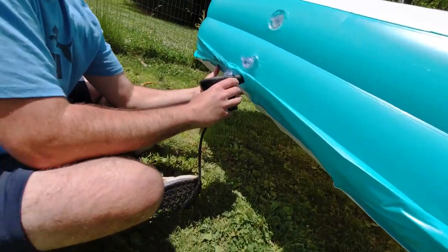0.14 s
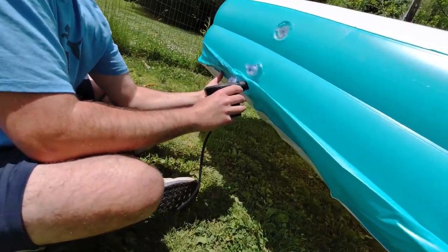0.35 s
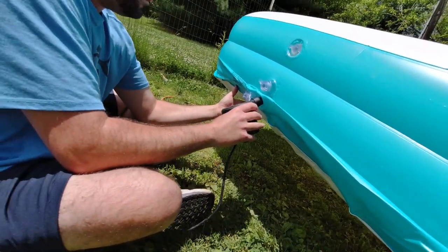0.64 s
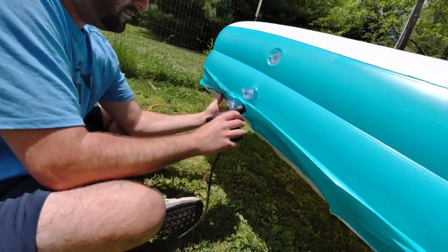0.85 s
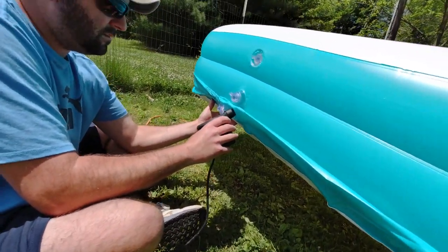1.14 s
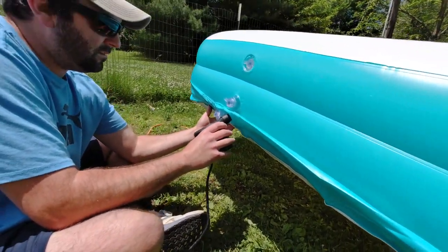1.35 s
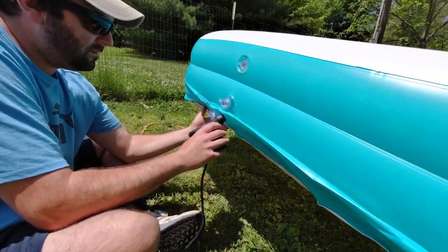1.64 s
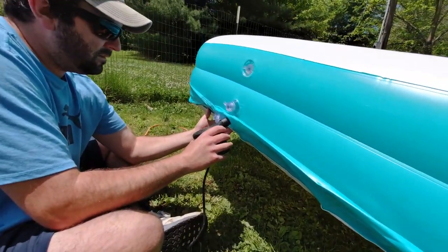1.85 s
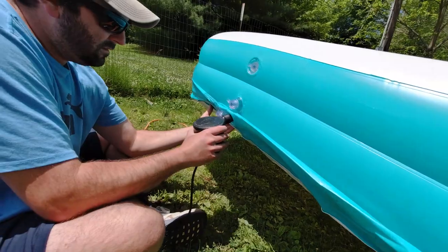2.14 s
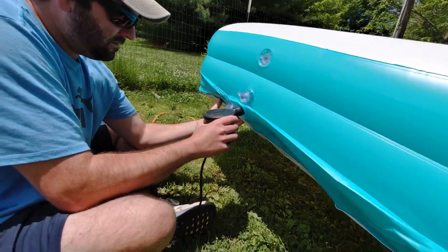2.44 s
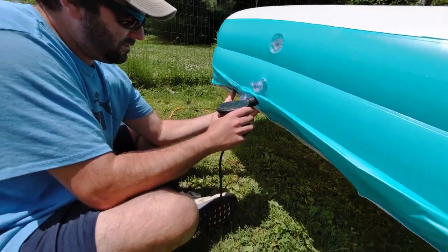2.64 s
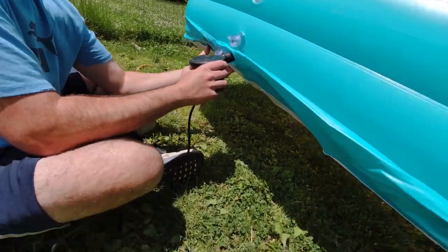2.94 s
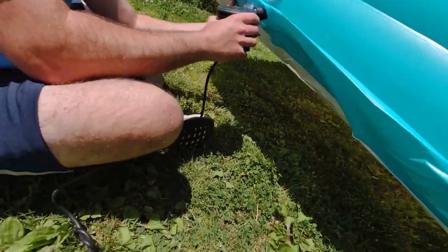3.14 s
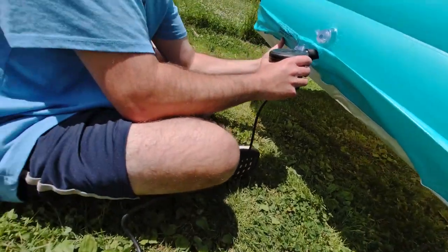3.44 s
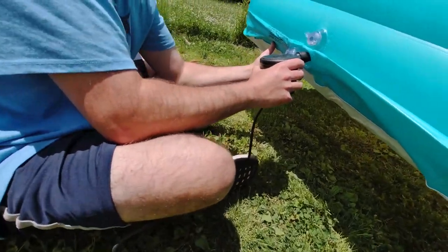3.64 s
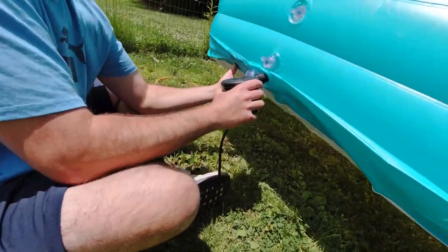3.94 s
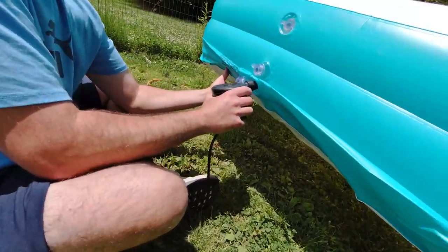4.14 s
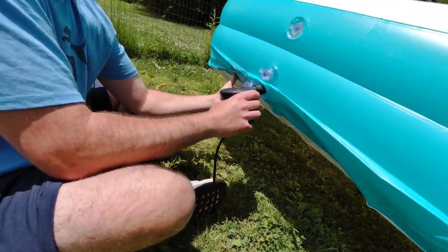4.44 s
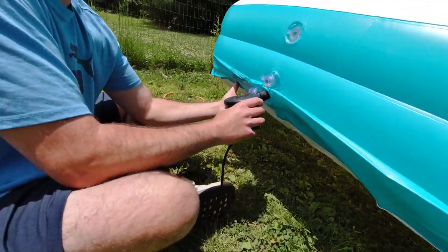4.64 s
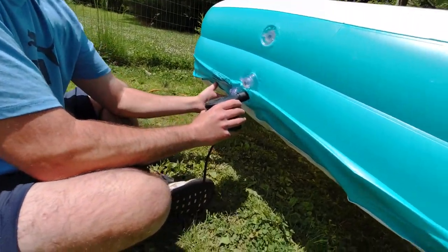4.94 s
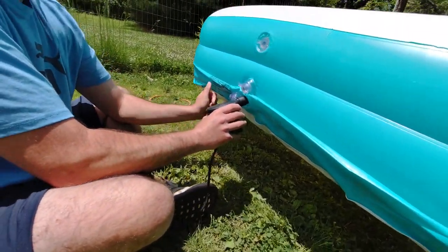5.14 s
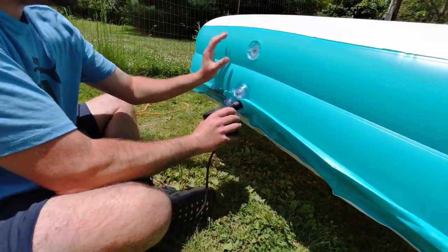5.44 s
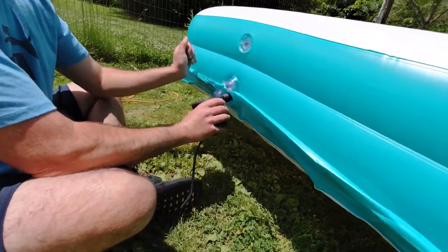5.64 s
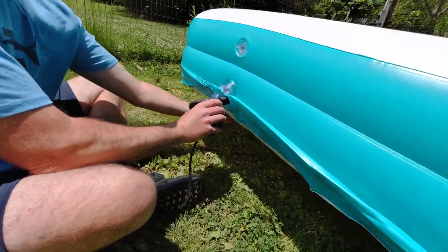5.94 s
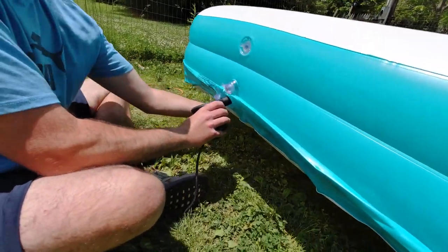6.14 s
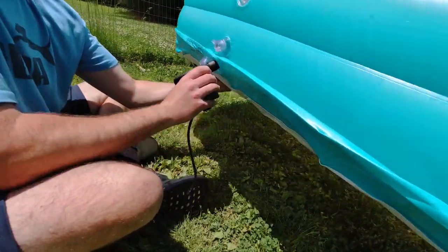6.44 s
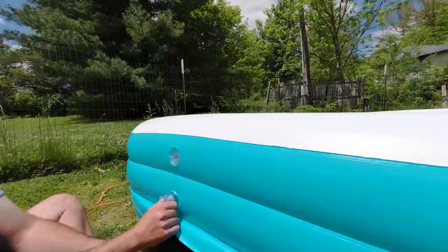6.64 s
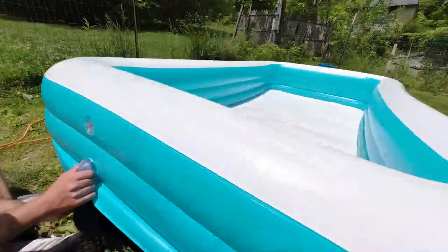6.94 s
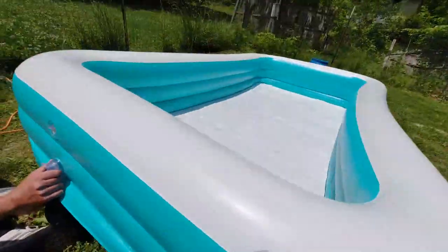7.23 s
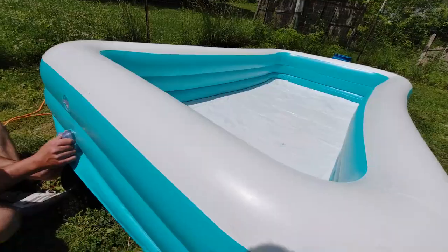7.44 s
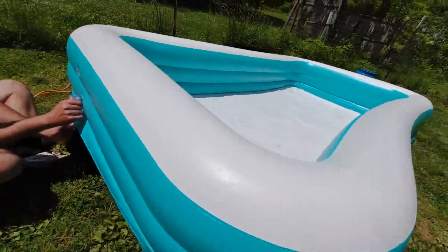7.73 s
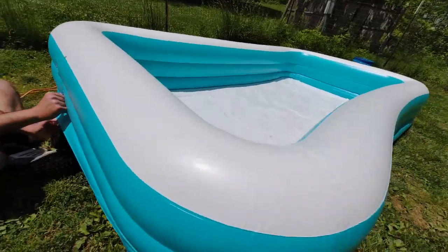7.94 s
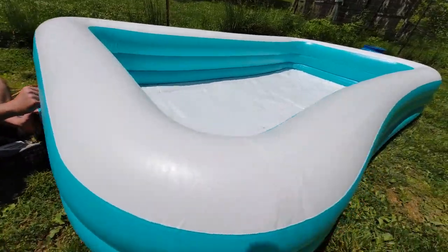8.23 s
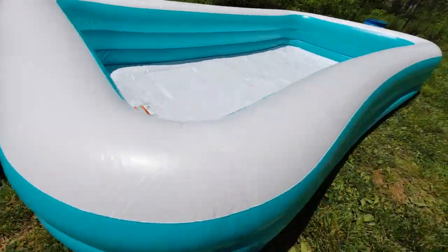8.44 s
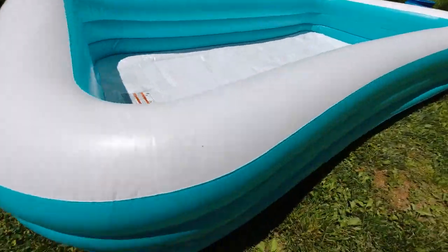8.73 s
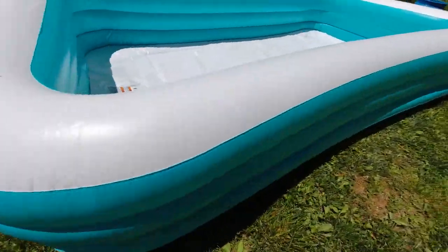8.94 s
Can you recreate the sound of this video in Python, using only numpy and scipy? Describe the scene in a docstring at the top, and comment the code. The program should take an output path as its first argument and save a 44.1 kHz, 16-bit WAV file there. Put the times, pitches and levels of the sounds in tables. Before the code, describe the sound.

An electric pump blows air into a vinyl pool, heard close and dry in the open. Its high motor whine swells and dips over turbulent rushing air, occasionally whistling as the gap at the valve changes. After two muffled hand pats, an instant change of distance leaves a thinner, quieter whine about a semitone and a half lower, with a narrow airy whistle. Soft wind rumble and a very faint low engine drone lie underneath.

```python
"""A hand-held electric blower fills a vinyl pool on a lawn; a far engine hums and wind buffets the microphone.
Close by at first, a six-blade rotor whines on its shaft orders over turbulent air that rings housing, valve
and wall, coloured by the hands; hollows between hands, nozzle and wall whistle now and then as gliding noise.
Late in this part two soft pats ring a low wall mode. Then the listening place jumps a few steps back: the
whine is weaker and lower in pitch, and the air has other resonances and levels."""
import sys
import numpy as np
from scipy import signal
from scipy.fft import rfft, irfft, next_fast_len
from scipy.io import wavfile
from scipy.ndimage import uniform_filter1d

SR = 44100
rng = np.random.default_rng(int(sys.argv[2]) if len(sys.argv) > 2 else 0)


def waveform_to_disk(signal):
    """Save audio, clipped to [-1, 1], as 16-bit WAV at the path in sys.argv[1]."""
    frames = np.transpose(np.atleast_2d(signal))
    scaled = np.clip(frames, -1, 1) * 32767
    samples = np.round(scaled).astype(np.int16)
    wavfile.write(sys.argv[1], SR, samples)


N = 399987
TIME_S = np.arange(N) / SR


def undb(db):
    """Decibels to amplitude gain."""
    return 10 ** (np.asarray(db) / 20)


def play(table):
    """Columns of a curve table after its time column, interpolated to one value a sample."""
    s, *columns = np.transpose(table)
    return [np.interp(TIME_S, s, column) for column in columns]


def smooth_twice(x, size):
    """Two moving averages in a row, a simple low-pass."""
    return uniform_filter1d(uniform_filter1d(x, size), size)


def walk(rate_hz):
    """Random levels held 1 / rate_hz seconds and slewed twice; spread near 1."""
    hold = int(SR / rate_hz)
    levels = rng.standard_normal(N // hold + 1)
    return 1.23 * smooth_twice(np.repeat(levels, hold), hold)[:N]


def ringing(hz, width_hz, steep=1.0):
    """Noise in one resonance, unit density at the centre; a larger steep narrows it and steepens its skirts."""
    size = next_fast_len(N)
    f = np.arange(1, size // 2 + 2) * SR / size
    detune = (f - hz ** 2 / f) / width_hz
    gain = (1 + detune ** 2) ** (-steep / 2)
    return irfft(rfft(rng.standard_normal(size)) * gain, size)[:N]


def tone(order, turn_rad):
    """One shaft order as a cosine locked to the rotor angle, at a random phase."""
    return np.cos(order * turn_rad + 2 * np.pi * rng.random())


# Gusts. Each row: time of peak in seconds, peak level in dB, rise and fall time constants in seconds.
GUSTS = [(.3, -54, .4, .3), (2.4, -53, .1, 0.23), (3.21, -43.5, 0.27, 0.25), (4.12, -42.5, 0.27, 0.12),
         (4.6, -56, 0.18, 1), (6.82, -45.5, 0.18, 0.67), (7.56, -41.5, 0.068, 0.84),
         (8.74, -44, 0.059, 0.22)]
CALM_DB, FLOOR_DB = -60, -72.0
WIND_HZ, WIND_TAIL_DB = 9.4, -27  # tail level relative to the low buffeting


def wind():
    """Slow buffeting on the microphone port, with a weak tail into the bass, over a steady outdoor floor."""
    low = ringing(WIND_HZ, 12.3, steep=3.0)
    tail = ringing(41, 60, steep=3.2)
    floor = ringing(130, 220, steep=1.4)
    force = undb(CALM_DB)
    for s, db, rise_s, fall_s in GUSTS:
        force = force + undb(db) * np.exp(np.minimum((TIME_S - s) / rise_s, (s - TIME_S) / fall_s))
    buffeting = low / np.std(low) + undb(WIND_TAIL_DB) * tail / np.std(tail)
    return force * buffeting + undb(FLOOR_DB) * floor / np.std(floor)


# Far engine tones. Each row: pitch in Hz, rms level at the loudest in dB close by, the same far off,
# beat length in seconds, time of a loudest moment in seconds, beat depth 0-1.
HUM = [(94.5, -59, -87, 2.44, 1.34, 0.91), (120.4, -66, -86, 4.2, 3.44, 0.47),
       (189.4, -68.5, -79, 4.5, 1.75, 0.74), (76, -85, -67, 2.6, 8.47, 1)]


def engine(close):
    """Low tones that waver a little in pitch and beat slowly."""
    hum = np.zeros(N)
    for hz, near_db, far_db, beat_s, loud_s, depth in HUM:
        level = np.sqrt(2) * undb(far_db + (near_db - far_db) * close)
        beat = 1 - depth * np.sin(np.pi * (TIME_S - loud_s) / beat_s) ** 2
        phase = 2 * np.pi * np.cumsum(hz * (1 + 0.00615 * walk(3))) / SR
        hum += level * beat * np.cos(phase)
    return hum


# Pats on the taut wall. Each row: start in seconds, level in dB before onset and decay act,
# mode in Hz, 60 dB decay time in seconds.
PATS = [(5.782, -28, 230, 0.027), (6.056, -32, 132, 0.056)]
PAT_ONSET_S = 0.0035


def pats():
    """A soft hand starts one low wall mode, a decaying sine with a rounded onset."""
    out = np.zeros(N)
    for s, db, hz, t60_s in PATS:
        t = np.clip(TIME_S - s, 0, None)
        envelope = (1 - np.exp(-t / PAT_ONSET_S)) * undb(-60 * t / t60_s)
        out += undb(db) * envelope * np.sin(2 * np.pi * hz * t)
    return out


# Whistling hollows between hands, nozzle and wall. Each row: start in seconds, end in seconds,
# first pitch in Hz, last pitch in Hz, nominal noise width in Hz, rms level midway in dB.
HOLLOWS = [(0.053, 0.397, 1323, 1280, 204, -33.5), (4.793, 5.42, 4740, 4900, 350, -46),
           (5.4, 6.3, 4900, 5020, 150, -55), (5.5, 6.086, 5380, 5400, 110, -46),
           (6.099, 6.338, 3160, 3350, 180, -48), (6.272, 6.503, 5370, 5420, 130, -49),
           (6.365, 6.47, 2560, 2480, 120, -37.5), (6.38, 6.509, 4650, 4900, 300, -45),
           (6.526, 6.675, 1480, 1460, 150, -37), (6.898, 8.245, 2363, 2410, 40, -52)]


def hollows():
    """Narrow noise whose centre glides while a hollow opens and closes."""
    out = np.zeros(N)
    for start_s, end_s, first_hz, last_hz, width_hz, db in HOLLOWS:
        along = np.clip((TIME_S - start_s) / (end_s - start_s), 0, 1)
        phase = 2 * np.pi * np.cumsum(first_hz + (last_hz - first_hz) * along) / SR
        size = int(SR / width_hz / 2)
        a, b = (smooth_twice(rng.standard_normal(N), size) for _ in range(2))
        whistle = (a * np.cos(phase) + b * np.sin(phase)) / np.std(a)
        out += undb(db) * np.abs(np.sin(np.pi * along)) * whistle
    return out


def stream(modes):
    """One air stream through its resonances, which trade strength as the hands shift; rms held at 1."""
    x = sum(undb(db + 2.8 * walk(2.364)) * ringing(hz, width_hz, steep=1.46) for hz, width_hz, db in modes)
    return x / np.sqrt(uniform_filter1d(x ** 2, SR // 3))


def wall_echo(x, share=0.21, lag_s=0.003, drift_s=0.00021):
    """An echo off the pool wall whose path drifts as the microphone moves; its notches wander."""
    lag = SR * (lag_s + drift_s * walk(1.5))
    echo = np.interp(np.arange(N) - lag, np.arange(N), x)
    return (x + share * echo) / np.sqrt(1 + share ** 2)


THROB_TOP_HZ = 2000


def rushing_air(turn_rad, air_db, rings, centres_hz):
    """Turbulent streams, the low ones throbbing once a turn, joined by their echo off the wall."""
    throb = 1 + 0.15 * np.cos(turn_rad)
    rush = np.zeros(N)
    for db, modes, centre_hz in zip(air_db, rings, centres_hz):
        air = undb(db + 0.75 * walk(12)) * stream(modes)
        rush += air * throb if centre_hz < THROB_TOP_HZ else air
    return wall_echo(rush)


# Weaker orders, from unbalance and the commutator bars. Each row: shaft order,
# dB relative to the air stream nearest in pitch close by, the same far off.
WEAK_ORDERS = [(4, -32, -6), (5, -11.5, -16), (7, -19.5, -26), (25, -16, -10), (35, -20, -21),
               (39, -12, -15), (42, -12, -12)]


def weak_orders(place, turn_rad, hz, air_db, centres_hz):
    """Each weak order shares the path of the air stream nearest in pitch, and fades in and out."""
    tones = np.zeros(N)
    for order, *weak_db in WEAK_ORDERS:
        nearest = np.argmin(np.abs(np.log(centres_hz / (order * np.mean(hz)))))
        fading_db = 3.0 * walk(2.15) + 2.0 * walk(9)
        tones += undb(weak_db[place] + air_db[nearest] + fading_db) * tone(order, turn_rad)
    return tones


# Orders that sing out as the pump turns in the hand. Each row: shaft order, time of peak in seconds,
# whole length in seconds, gain added at the peak in dB.
SWELLS = [(30, .65, 0.32, -66), (24, .9, 1, -60), (18, 1.05, 0.91, -49.5), (30, 1.53, .9, -61),
          (18, 1.82, 0.6, -52), (24, 2.14, 0.37, -60), (18, 3.08, 0.48, -55), (20, 3.07, .4, -63),
          (29, 3.03, .4, -62), (24, 3.23, 0.6, -54), (40, 3.4, 0.52, -60), (30, 2.5, 1, -65.5),
          (29, 2.56, 0.54, -69), (30, 3.74, .8, -53.5), (20, 3.95, 0.54, -58), (29, 4.22, 0.52, -59),
          (18, 4.38, 0.75, -51.5), (24, 4.51, .8, -50), (20, 4.58, .5, -64), (30, 4.55, 0.45, -63),
          (20, 5.1, .6, -59), (29, 5.12, .4, -63), (30, 5.6, .4, -61), (18, 5.26, 0.92, -47.5),
          (24, 5.61, 0.6, -47.5), (29, 5.71, 0.28, -61), (18, 5.92, 0.65, -59), (30, 6.0, 0.34, -59),
          (24, 6.36, 0.84, -52), (18, 6.5, 0.55, -52), (20, 6.6, .3, -62), (30, 6, .25, -65),
          (18, 7.1, 1, -65.5), (24, 7.2, .8, -63), (30, 7.6, 0.97, -71.5), (18, 7.72, 0.13, -62),
          (20, 7.8, .6, -63), (40, 7.7, .4, -75), (18, 8.1, .3, -69), (18, 8.55, .15, -70),
          (24, 8.4, .4, -76), (18, 8.95, 0.36, -73)]


def swells(order):
    """Gain that the moments of singing out, half-cosine arches, add to one shaft order."""
    return sum(undb(db) * np.cos(np.pi * np.clip((TIME_S - s) / length_s, -0.5, 0.5))
               for k, s, length_s, db in SWELLS if k == order)


# Strong orders besides the blade tone. Each row: shaft order, level in dB close by, level in dB far off,
# dB gained by full wall contact, share of the blade tone's swing, random fading in dB.
ORDERS = [(1, -50, -62, 10.5, 0.011, 0.05), (2, -53, -81, 3, -0.18, 3.5), (3, -47, -73, -2, -0.2, 3),
          (10, -52.5, -79, 0, -0.22, 2), (18, -65, -76, 2, 0.24, 0.5), (20, -68, -76, 0, 0.078, 4),
          (24, -67.5, -76, 3, .1, 3.5), (29, -74, -86, 5, 0, 3), (30, -67.5, -87, 2, 0, 3),
          (40, -70, -95, -3, 0.047, 0)]
# Blade level that the swing is counted from: dB close by, dB far off.
BLADE_MEAN_DB = -30, -42
BLADES = 6


def strong_orders(place, turn_rad, blade, wall_contact):
    """Near-clean tones: the blade rate, its octave and other orders that partly follow the blade's swing."""
    blade_db, octave_db = play(blade)
    swing_db = np.maximum(blade_db - BLADE_MEAN_DB[place], -10)
    loud = [(BLADES, blade_db), (2 * BLADES, octave_db)]
    for order, *levels_db, wall_db, share, fade_db in ORDERS:
        db = levels_db[place] + wall_db * wall_contact + share * swing_db + fade_db * walk(3.006)
        loud.append((order, db))
    tones = np.zeros(N)
    for order, db in loud:
        # the higher an order, the more it flutters with small moves of the microphone
        flutter_db = 0.77 * walk(30) + 0.15 * order * walk(12)
        tones += (undb(db) + swells(order)) * undb(flutter_db) * tone(order, turn_rad)
    return tones


# Shaft speed. Each row: time in seconds, turns a second.
SHAFT_NEAR = [(0.0, 342.9), (0.23, 339.0), (0.46, 338.2), (0.69, 343.3), (0.92, 346.5), (1.2, 347.1),
              (2.07, 347.7), (2.52, 345.2), (3.44, 344.6), (4.13, 345.0), (4.62, 344.5), (5.05, 347.0),
              (5.51, 348.6), (6.0, 348.8), (6.66, 347.9)]
SHAFT_FAR = [(6.66, 320.6), (6.9, 320.2), (7.38, 318.5), (7.62, 317.4), (8.35, 316.6), (8.59, 315.8),
             (8.83, 316.1), (9.07, 317.0)]
# Blade tone; it fades as direct sound and its echo off wall and lawn cancel.
# Each row: time in seconds, level in dB, level of its octave in dB.
BLADE_NEAR = [(0.02, -28, -52), (0.13, -27, -41), (0.48, -34.5, -57), (0.82, -28, -42),
              (1.16, -23.5, -38.5), (1.5, -29.5, -47), (1.73, -25.5, -45.5), (1.96, -26.5, -48),
              (2.07, -36, -37), (2.16, -55, -40.5), (2.24, -45, -45.5), (2.5, -40, -49), (3.03, -32.5, -38),
              (3.11, -52, -42), (3.19, -34.5, -51), (3.701, -31.5, -47.5), (3.82, -36, -41.5),
              (4.07, -46.5, -36.5), (4.24, -33, -45.5), (4.7, -23.5, -46), (4.785, -33, -38),
              (4.84, -29, -36), (4.92, -24.5, -35.5), (5.38, -26, -32.5), (5.61, -21.5, -35),
              (5.95, -24.5, -37), (6.12, -21.5, -34.5), (6.29, -26, -40.5), (6.38, -22.5, -38),
              (6.42, -38, -45), (6.46, -34, -35), (6.5, -24, -31.5), (6.55, -25, -35), (6.645, -20, -36.5)]
BLADE_FAR = [(6.68, -54, -58), (6.77, -41, -58), (6.94, -41.5, -45.5), (7.08, -32.5, -45), (7.21, -46, -48),
             (7.44, -39.5, -49), (7.6, -52, -56.5), (7.73, -43.5, -45.5), (7.81, -40, -51),
             (7.85, -30, -53), (7.97, -29, -60), (8.08, -37, -69), (8.33, -41, -57), (8.44, -50, -52),
             (8.52, -40, -47.5), (8.7, -48.5, -58), (8.87, -40.5, -51.5), (9.05, -44, -49)]
# Grip close by. Each row: time in seconds, valve leak 0-1, hand cupped round the nozzle 0-1,
# wall contact 0-1, treble 0-1, dB added to the upper leak band.
GRIP = [(0.0, .75, 0, 0, 0.63, 1.5), (0.2, 0.84, 0.3, 0, 1, -0.5), (0.46, 0.63, 0, 0, 0.36, 1),
        (0.55, 0.13, .35, 0.37, 0.57, 2), (0.87, 0, 0.62, 0.02, 0.6, 0.5),
        (1.0, 0.53, 0.34, 0.12, 0.43, -3), (1.76, 0.33, 0.6, 0.19, 0.3, -3),
        (2.15, 0.8, .1, 0.15, 0.12, -2), (2.6, .85, 0, 0.3, 0.1, -2), (3.24, 0.88, 0, 0.26, 0.25, -1),
        (3.97, 0.47, 0.4, 0.25, 0.44, 1), (4.25, .85, 0, 0.27, 0.45, -1.5),
        (4.71, 0.58, 0.36, 0.64, 0.44, -1.5), (4.97, 0.18, 0.83, 1, 0.88, 0),
        (5.21, 0.13, 1, 0.98, 0.57, 2), (5.78, 0.1, 1, 0.98, 0.35, -2), (6.29, 0.43, 1, 0.7, 0.34, -10),
        (6.54, 0.14, 0.92, 0.5, 0.6, -2.5), (6.66, .1, 0.74, 0.34, .5, 2)]
# Controls far off. Each row: time in seconds, distance 0-1, valve whistle 0-1,
# wall contact 0-1, treble 0-1, dB added to the upper leak band.
STROLL = [(6.66, 0, .8, .8, 1, 0), (6.68, 0.4, .8, 0.75, .8, 0), (6.89, 0.16, 1, 0.57, .4, -1),
          (7.2, 0.4, 0.4, 0.16, .35, 0), (7.55, 0.53, 0.27, 0.06, 0.4, -2),
          (7.82, 0.54, 0.33, 0.25, 0.9, 1), (8.05, 0.74, 0.67, 0.2, 0.5, -1),
          (8.35, 0.97, 0.36, 0.62, 0.2, 0.5), (8.7, 1, 0.4, 0.7, 0, 1), (9.07, 0.8, 0.4, 0.83, 0, 5)]
# Air streams, low to high. Each row: level in dB with all controls at 0,
# then dB added by each of the four 0-1 controls at 1.
AIR_NEAR = [(-67.5, 1.5, 3.5, 9, 9), (-45, 0.5, -1, 7.5, 0.5), (-57, -2.5, 20.5, -0.5, -1),
            (-54.5, 22.5, -1.5, 0, 6), (-41.5, 10, 0.5, -0.5, 0.5), (-42, 0, -1, -1, 4.5),
            (-52, -1.5, 1.5, 1, 10.5), (-56, 6, -0.5, 0.5, 6.5), (-59, 0, -2, 0.5, 3)]
AIR_FAR = [(-68, -3.5, 0, 7, 6), (-70, -3, -1, 18.5, 4), (-46, -19.5, 0.5, -9, 5),
           (-56.5, 0.5, 13.5, -0.5, -0.5), (-50.5, -4.5, 0, 1, 2.5), (-47.5, -9.5, 0, 2, -0.5),
           (-48, -12.5, -1.5, 0, 1), (-66, -2.5, -3, -2, 10), (-86, -9, 0, 0, 26)]
# Resonances, one list an air stream. Each row: centre in Hz, nominal width in Hz, dB relative to its stream's others.
RING_NEAR = [
    [(250, 190, -3.5), (350, 77, 7), (436, 91, 3.5)],
    [(594, 310, -20), (778, 67, 0.5)],
    [(936, 79, 0.5), (1096, 134, 1)],
    [(1192, 140, 2.5), (1350, 81, -7.5)],
    [(1495, 180, 1.5), (1690, 210, -0.5), (1964, 150, -6)],
    [(2370, 420, 1), (2810, 120, -1.5), (3220, 150, -3.5), (3466, 180, 0.5), (3990, 500, -3)],
    [(4380, 460, 0), (4845, 210, 5), (5316, 150, 4.5)],
    [(6400, 1300, 2.5), (8050, 1470, 4), (9100, 1300, -9)],
    [(12500, 1300, -1.5), (13300, 2000, 3.5)],
]
RING_FAR = [
    [(248, 73, 0), (436, 190, 0)],
    [(720, 390, 0)],
    [(970, 430, 0)],
    [(1250, 74, 0.5), (1210, 470, -13.5)],
    [(1470, 320, -0.65), (1820, 400, -1.4)],
    [(2396, 16, 0), (2370, 660, -7), (3460, 520, -25)],
    [(3900, 1300, 2.5), (5040, 1600, -2.5)],
    [(6370, 2400, 6), (7960, 500, -11)],
    [(11600, 2500, -2), (13700, 2700, 0)],
]
UPPER_LEAK = 4  # index of the upper leak band among the air streams


def blower(place, shaft, blade, controls, air, rings):
    """Shaft orders over rushing air, all on one slightly unsteady rotor angle; place 0 close by, 1 far off."""
    hz, = play(shaft)
    turn_rad = 2 * np.pi * np.cumsum(hz * (1 + 0.000357 * walk(40))) / SR
    *pulls, upper_db = play(controls)
    air_db = [db + sum(gain_db * pull for gain_db, pull in zip(gains_db, pulls)) for db, *gains_db in air]
    air_db[UPPER_LEAK] = air_db[UPPER_LEAK] + upper_db
    centres_hz = np.array([np.mean([mode[0] for mode in modes]) for modes in rings])
    tones = strong_orders(place, turn_rad, blade, wall_contact=pulls[2])
    tones = tones + weak_orders(place, turn_rad, hz, air_db, centres_hz)
    return np.sqrt(2) * tones + rushing_air(turn_rad, air_db, rings, centres_hz)


STEP_BACK_S, STEP_LENGTH_S = 6.658, 0.001


def scene():
    """All layers; the listening place jumps back from the blower in one step."""
    close = np.clip((STEP_BACK_S - TIME_S) / STEP_LENGTH_S, 0, 1)
    near = blower(0, SHAFT_NEAR, BLADE_NEAR, GRIP, AIR_NEAR, RING_NEAR)
    far = blower(1, SHAFT_FAR, BLADE_FAR, STROLL, AIR_FAR, RING_FAR)
    pump = close * near + (1 - close) * far
    return np.tile(wind() + engine(close) + pats() + hollows() + pump, (2, 1))


TOP_HZ = 15500


def record(dry):
    """One microphone on both channels; a steep elliptic low-pass cuts the top."""
    low_pass = signal.ellip(10, 0.2, 70, TOP_HZ, fs=SR, output="sos")
    return signal.sosfilt(low_pass, dry)


dry = scene()
out = record(dry)
waveform_to_disk(out)
```